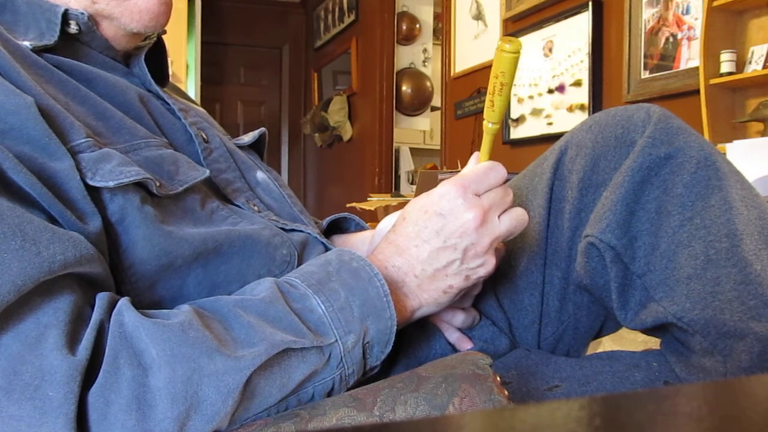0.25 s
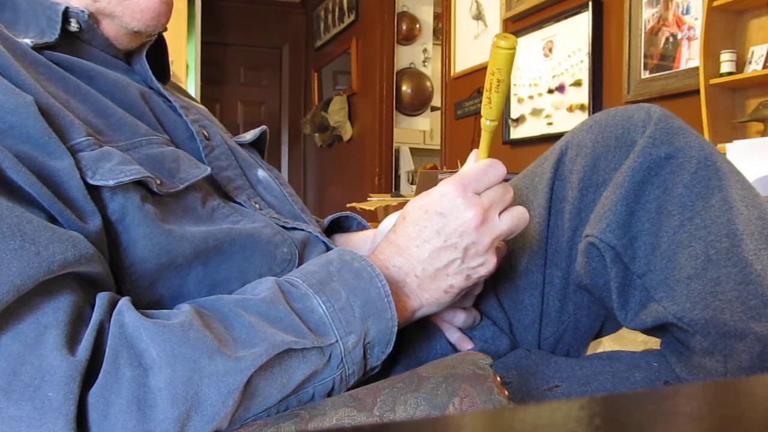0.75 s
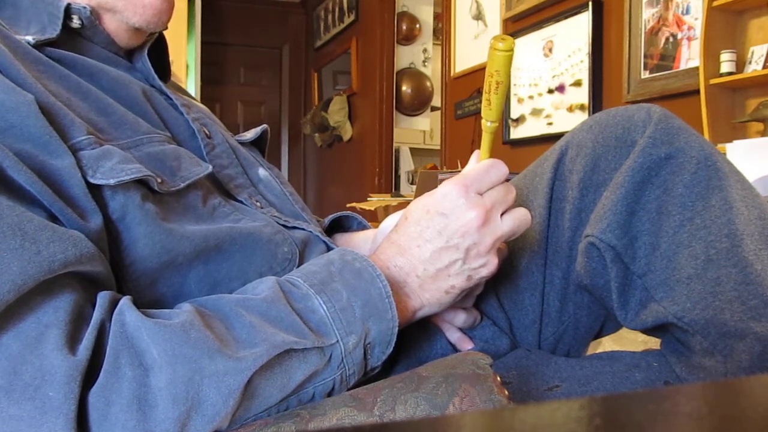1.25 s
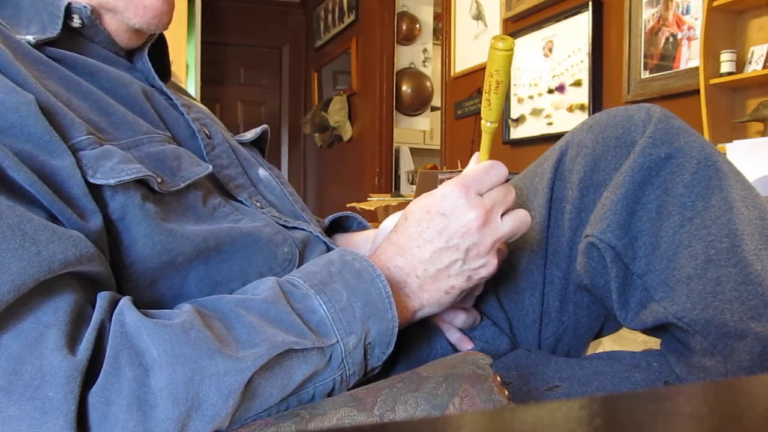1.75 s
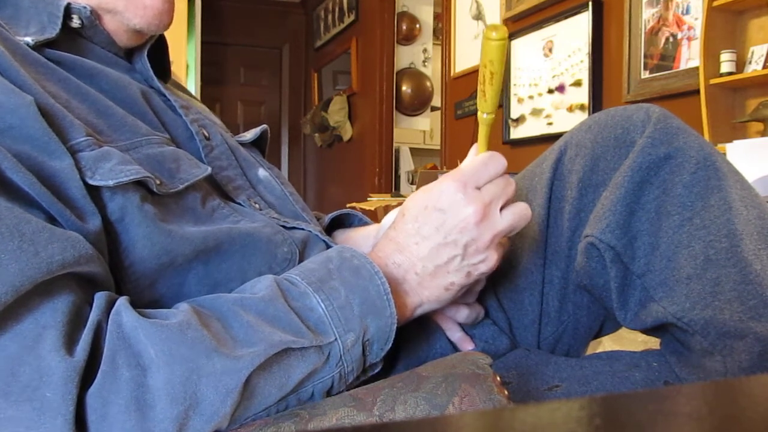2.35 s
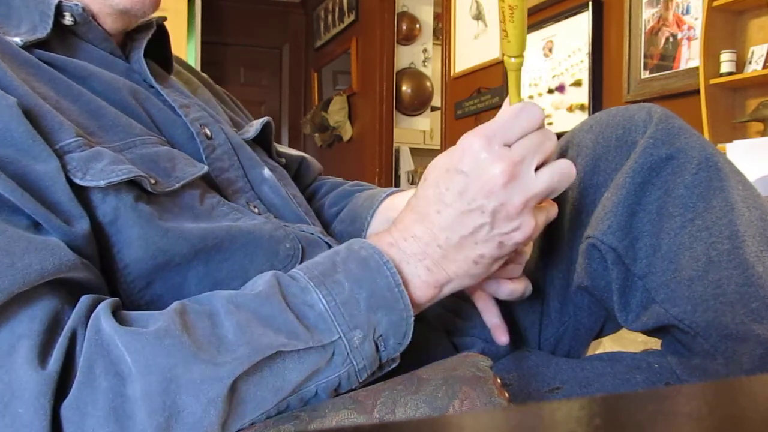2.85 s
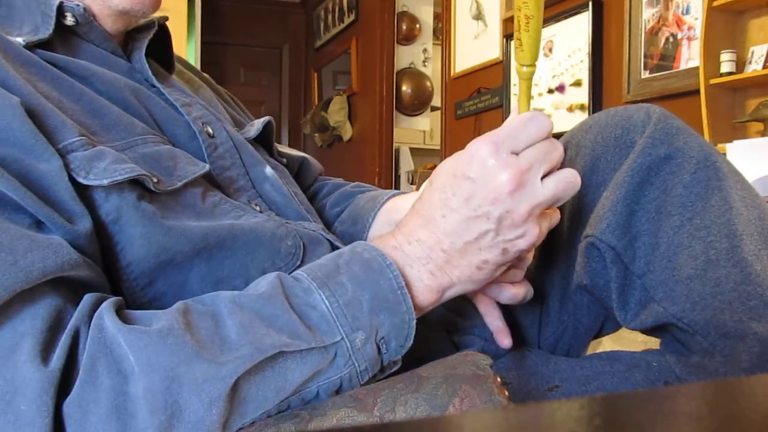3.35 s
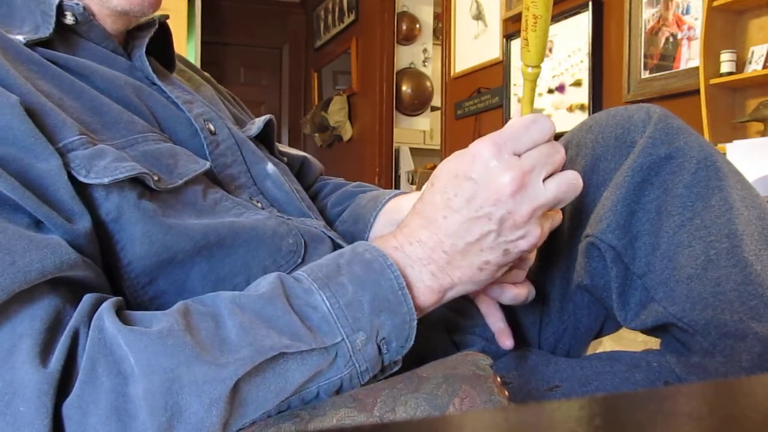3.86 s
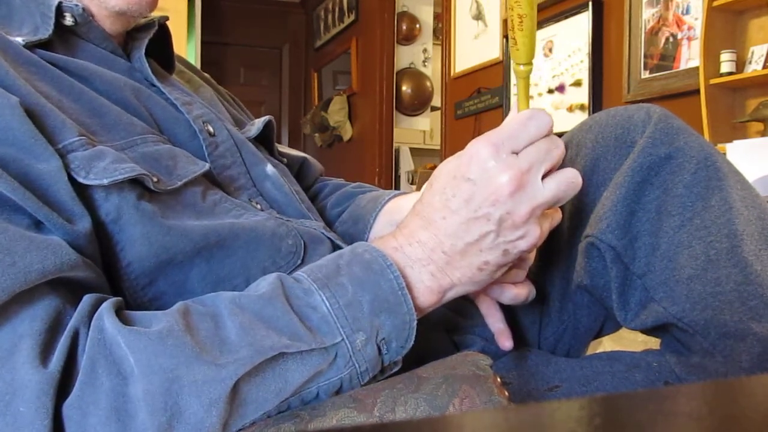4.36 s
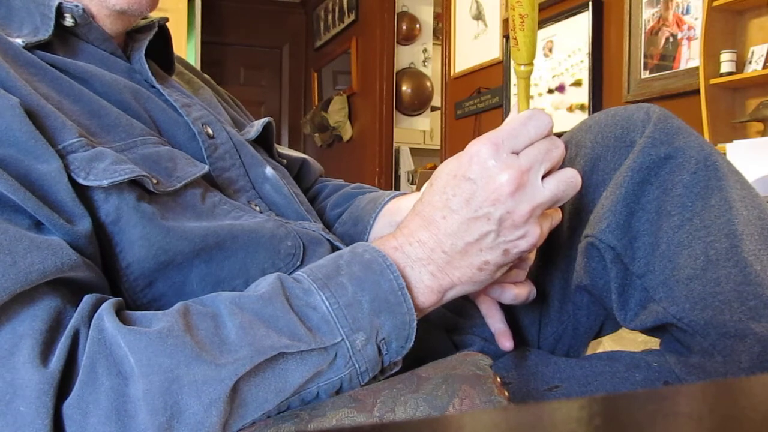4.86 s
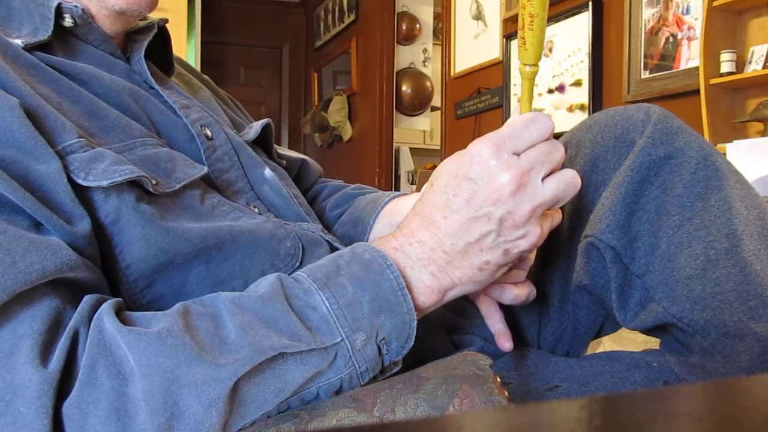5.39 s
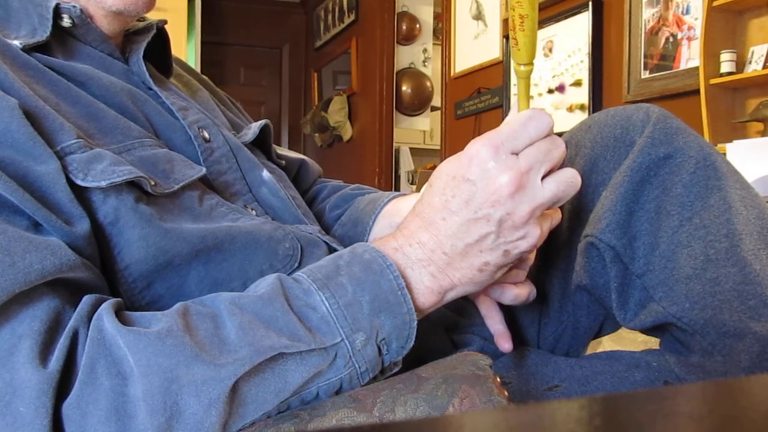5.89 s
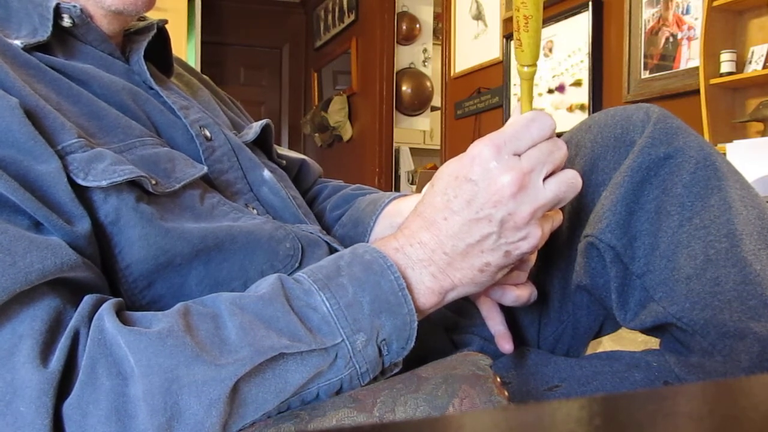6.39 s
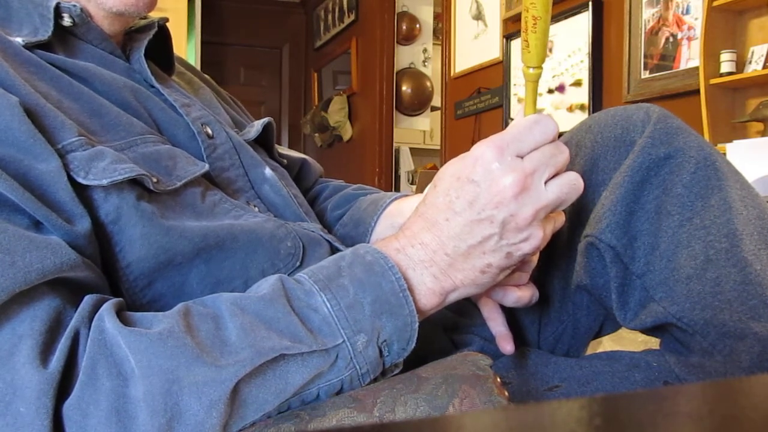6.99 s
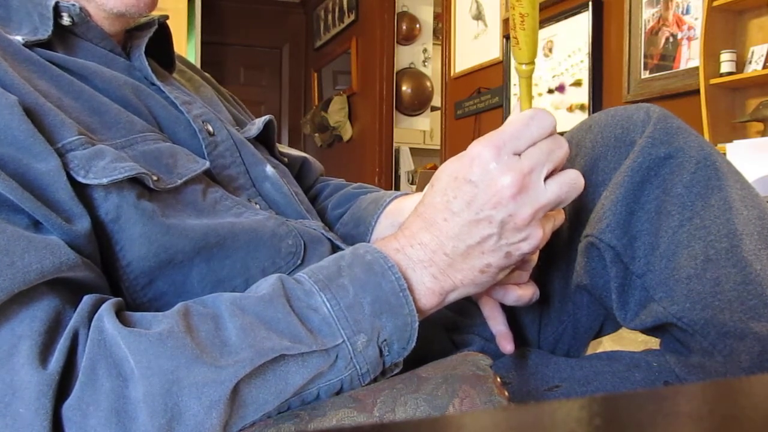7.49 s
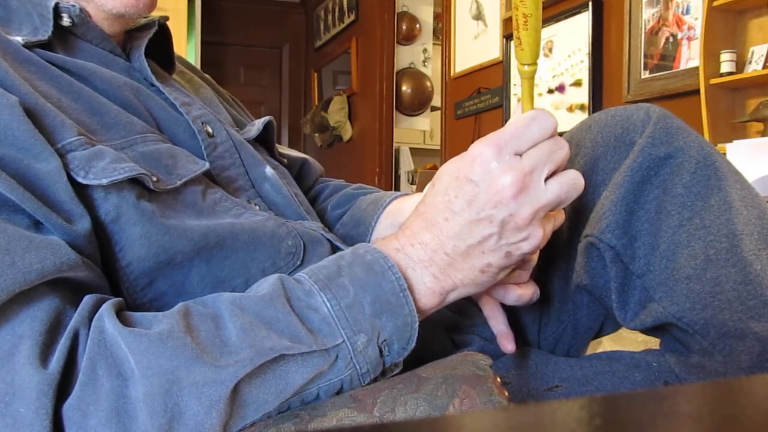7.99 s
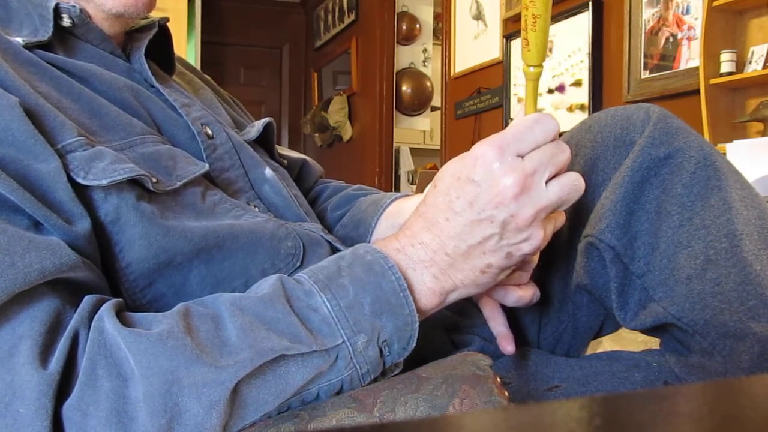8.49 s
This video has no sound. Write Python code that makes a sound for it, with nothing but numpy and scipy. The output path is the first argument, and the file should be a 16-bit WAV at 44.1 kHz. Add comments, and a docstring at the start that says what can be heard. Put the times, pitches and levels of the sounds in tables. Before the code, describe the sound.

Two sharp, woody turkey-like clucks from a friction pot call, then five short rattling purrs spaced by quiet pauses in a small, quiet room.

```python
"""A small quiet room, where a wooden striker is worked on a friction pot call: two sharp clucks, then five purrs.
Stick-slip friction repeats some 800 times a second and the pot brings out the second harmonic; in a purr
the tip skips from one short squeak to the next over a dry scrape. Soft taps are heard as the tip is set down.
Sleeves, made of shaped noise, rustle once; noise bands and steady tones form the faint rumble, hiss and hum."""
import sys
import numpy as np
from scipy import signal
from scipy.fft import rfft, irfft, next_fast_len
from scipy.io import wavfile
from scipy.ndimage import map_coordinates

SR = 44100
rng = np.random.default_rng(int(sys.argv[2]) if len(sys.argv) > 2 else 0)


def waveform_to_disk(signal):
    """Save audio, clipped to [-1, 1], as 16-bit WAV at the path in sys.argv[1]."""
    frames = np.transpose(np.atleast_2d(signal))
    scaled = np.clip(frames, -1, 1) * 32767
    samples = np.round(scaled).astype(np.int16)
    wavfile.write(sys.argv[1], SR, samples)


N = 385434
TIME = np.arange(N) / SR

# squeaks that stand out in the five purrs: middle_s, length_s, level_db, nominal pitch_hz in the grip
SQUEAKS = [(1.578, 0.02383, -43.5, 714.5), (1.626, 0.0168, -39, 760.6), (1.684, 0.021, -35.5, 801),
           (1.726, .017, -37.5, 819.5), (1.788, .022, -37, 813.7), (1.894, 0.0255, -24.5, 797.3),
           (1.938, 0.011, -21.5, 813), (1.982, .021, -24.5, 851), (2.017, 0.017, -14, 799.7),
           (2.06, 0.014, -17.5, 840), (3.321, 0.021, -26, 721.8), (3.333, 0.024, -24.5, 791.2),
           (3.357, 0.027, -16.5, 737.2), (3.434, 0.013, -20.5, 787.5), (3.467, 0.021, -14.5, 778),
           (3.554, 0.016, -16, 797.6), (3.595, .018, -11.5, 794.7), (3.683, .016, -12.5, 820.4),
           (3.721, 0.012, -11, 773), (3.77, .018, -18, 847), (3.816, 0.024, -14.5, 846),
           (5.008, .026, -36, 780), (5.03, 0.023, -20, 726), (5.053, 0.034, -23, 801.5),
           (5.078, 0.02, -19, 734.5), (5.137, 0.027, -16, 748.6), (5.169, 0.029, -15.5, 736.7),
           (5.251, 0.016, -17.5, 788.8), (5.27, 0.033, -15, 788.7), (5.296, .023, -20, 839.6),
           (5.356, 0.012, -17.5, 822.5), (5.394, .022, -11.5, 710.8), (5.413, 0.029, -20.5, 809),
           (5.465, .018, -12, 763), (5.498, 0.0398, -14, 786), (5.554, 0.013, -10, 772.3),
           (5.591, 0.013, -9.5, 718), (6.686, .017, -33.5, 771), (6.722, .014, -24, 787.5),
           (6.759, .021, -17.5, 765.3), (6.801, 0.014, -17, 699.8), (6.841, 0.018, -17, 762.6),
           (6.91, .022, -18.5, 790.5), (6.949, 0.046, -16.5, 793), (7.043, .025, -11.5, 712.7),
           (7.072, 0.027, -15, 780), (7.122, .018, -11, 737.7), (7.162, .02, -11.5, 774.3),
           (7.19, 0.022, -16, 799), (7.232, .014, -35, 783), (8.284, 0.029, -31, 666.5),
           (8.321, 0.016, -30.5, 748), (8.386, .027, -22.5, 708), (8.413, 0.052, -25, 762),
           (8.485, .026, -24.5, 789), (8.518, 0.028, -18.5, 751), (8.544, 0.026, -27, 810),
           (8.59, 0.014, -23.5, 813), (8.626, 0.024, -14, 700), (8.715, 0.033, -16.5, 764.5)]
# one row per purr: chatter_start_s, chatter_end_s, then fundamental_db and scrape_db at the start
PURRS = [(1.6, 1.8, -29.5, -37), (3.34, 3.8, -37.5, -38.5), (5.01, 5.6, -39.5, -43),
         (6.7, 7.24, -39, -41.5), (8.358, 8.72, -39, -43)]
# hiss of the slipping contact, relative spectrum: freq_hz, density_db (per Hz)
GRIT = [(500, -52), (900, -14), (2300, 1.5), (3000, -9.5), (4500, -8.5), (6500, -12.5), (9000, -16.5),
        (12000, -17.5), (15500, -45)]


def amp(db):
    """The decibel law: level to amplitude ratio."""
    return 10 ** (np.asarray(db) / 20)


def unit(x):
    """Normalisation by effective value: x at rms 1."""
    return x / np.sqrt(np.mean(x ** 2) + 1e-20)


def along(points, hz):
    """Interpolation of (freq_hz, value) points on a logarithmic frequency axis."""
    f, v = np.transpose(points)
    return np.interp(np.log(hz + 1), np.log(f + 1), v)


def gains(rows):
    """Envelopes linear in decibels, one for each column after the time; silent before and after."""
    s, *columns = np.transpose(rows)
    sounding = (TIME > s[0] - .05) * (TIME < s[-1] + .05)
    return [amp(np.interp(TIME, s, column)) * sounding for column in columns]


def wobble(rate):
    """Random modulation, slow or rough: a smooth curve through random knots, rate of them a second."""
    knots = rng.standard_normal(int(N * rate / SR) + 4)
    return map_coordinates(knots, [TIME * rate], order=2)


def filtered(x, response):
    """Linear filtering: the spectrum of x times a complex response of frequency."""
    m = next_fast_len(N + 8192)
    return irfft(rfft(x, m) * response(np.fft.rfftfreq(m, 1 / SR)), m)[..., :N]


def noise(spectrum):
    """Coloured noise: white noise shaped by a spectrum, at rms 1."""
    return unit(filtered(rng.standard_normal(N), lambda hz: amp(along(spectrum, hz))))


def diffuse(spectrum, side_db):
    """A diffuse field: independent middle and side noises make stereo of rms 1."""
    mid, side = noise(spectrum), amp(side_db) * noise(spectrum)
    return unit(np.array([mid + side, mid - side]))


def background(right_db=.45):
    """Steady room noise as two diffuse bands and weak tones, growing over the first seconds."""
    # overall course: time_s, rumble_db, hiss_db
    course = [(0, -58.5, -58.5), (.8, -59, -61.5), (1.5, -56, -58.5), (2.2, -52.5, -55), (3, -50.5, -52.5),
              (8.7, -50, -52.5)]
    # relative noise spectra: freq_hz, density_db (per Hz)
    rumble_spectrum = [(15, -52), (25, -30.5), (48, -8.5), (85, -10.5), (108, -7.5), (145, -5.5), (229, 0),
                       (308, -9), (364, -8.5), (395, -7), (487, -7.5), (545, -11), (700, -18), (910, -41.5),
                       (1540, -120)]
    hiss_spectrum = [(350, -34.5), (700, -1.5), (1300, -4.5), (2150, -4), (4000, -9), (5800, -11.5),
                     (7500, -20.5), (9300, -21.5), (10100, -13), (10600, -19), (11100, -13.5), (11500, -21),
                     (11900, -14), (12400, -22), (13000, -19), (15500, -42)]
    # hum tones: freq_hz, level_db (rms, where the rumble is strongest, before the channel gains)
    hum_tones = [(59, -66.5), (120, -63.5), (240, -61), (931, -70), (1055, -67), (10104, -82)]
    rumble, hiss = gains(course)
    hum = np.zeros(N)
    for hz, db in hum_tones:
        hum += amp(db) * np.sqrt(2) * np.sin(2 * np.pi * hz * TIME + .5 * wobble(3.9))
    air = rumble * diffuse(rumble_spectrum, side_db=-8.0) + hiss * diffuse(hiss_spectrum, side_db=-1.5)
    return (air + hum * rumble / rumble.max()) * amp([[-right_db], [right_db]])


def pot(force):
    """Modal resonance: the response of plate and striker to a force on the plate."""
    # modes of plate and striker: freq_hz, width_hz, level_db
    modes = [(851, 100, -2), (1008, 144, 0.5), (1296, 36.5, 2), (1637, 110, -6.5), (2600, 110, -18),
             (4500, 180, -36.5)]

    def response(f):
        total = 0
        for k, (centre, width, db) in enumerate(modes):
            damping = 1j * f * width
            total = total + (-1) ** k * amp(db) * damping / (centre * centre - f * f + damping)
        return total / (1 + 1j * f / 3500)  # a gentle loss of treble

    return filtered(force, response)


def scrape(grains_per_s=2500):
    """Friction as random impulses: the tip stutters over the grain and excites the modes; rms 1."""
    catches = (rng.random(N) < grains_per_s / SR) * (1 + .5 * rng.standard_normal(N))
    return unit(pot(catches))


def overtones(pitch, phase, colour, order=2, bright=1):
    """Harmonics of the stick-slip cycle from the given order up, each as strong as the pot radiates it."""
    total = 0
    for k in np.arange(order, 19):
        level = amp(along(colour, k * pitch)) * (bright if k > 2 else 1)
        total = total + level * np.sin(k * phase + k * k)
    return total


def clucks(striker_hz=965, striker_db=-5, fade_s=0.0098, held=0.41, sag=0.095, jitter=.011,
           grit_db=-23, rasp_db=-20):
    """Onset of stick-slip: the striker shudders ever harder, the tip bites, the pot barks and its pitch sags."""
    # clucks: bite_s, length_s, level_db, nominal pitch_hz, build_s, striker hum_db after the bite
    cluck_rows = [(0.0219, .046, -3.5, 695.2, .0013, -31), (0.4182, .031, -4, 728, 0.0021, -18.5)]
    # strength of the harmonics that the pot radiates: freq_hz, level_db
    colour = [(700, -25), (1400, -1), (2150, -11.5), (2760, -31), (2930, -23), (3600, -33.5), (4150, -30.5),
              (4420, -18.5), (4800, -40), (7000, -38), (12000, -63)]
    out, waver = np.zeros(N), wobble(700)
    rough = amp(grit_db) * noise(GRIT) + amp(rasp_db) * scrape()
    for s, length, db, hz, build, hum_db in cluck_rows:
        near = slice(max(0, int((s - length) * SR)), int((s + 2 * length) * SR))
        t = TIME[near] - s
        bite = (1 + np.tanh(t / 0.001)) / 2
        force = held + (1 - held) * np.exp(-np.abs(t) / fade_s)
        release = (1 - np.tanh((t - length) / (0.15 * length))) / 2
        level = amp(db) * bite * force * release
        stroke = np.clip(t / length, 0, 1.1)
        bend = 0.017 * np.sin(np.pi * stroke ** 2) - sag * stroke ** 4
        pitch = hz * (1 + bend + jitter * waver[near])
        phase = 2 * np.pi * np.cumsum(pitch) / SR
        shudder = np.sin(2 * np.pi * striker_hz * t)
        swell = 1 / (1 + np.exp(-(t / build + 2.24)))
        lead_in = amp(striker_db) * (1 - bite) * swell * (shudder + 0.35 * swell * shudder ** 2)
        # the striker's mode beats with the slips: a rattle
        beat = amp(hum_db) * np.sin(2 * np.pi * striker_hz * t - phase)
        bark = (1 + 2 * beat) * overtones(pitch, phase, colour, order=1)
        out[near] += lead_in + level * (bark + amp(hum_db) * shudder + force * rough[near])
    return out


def taps(decay_s=0.0021, rise_s=0.00047, tap_db=3):
    """Damped free vibration: soft knocks as the tip is set down on the plate."""
    # taps: start_s, level_db (before tap_db), pitch_hz
    tap_rows = [(0.329, -29, 1117), (1.453, -33, 1100), (3.189, -28, 1270), (4.948, -34.5, 1403)]
    out, t = np.zeros(N), np.arange(SR // 20) / SR
    envelope = np.exp(-t / decay_s) * (1 - np.exp(-t / rise_s))
    for s, db, hz in tap_rows:
        knock = amp(db + tap_db) * np.sin(2 * np.pi * hz * t) * envelope
        out[round(s * SR):][:len(t)] += knock
    return out


def chatter(rate_per_s=24, length_s=.014, level_db=-42.5, pitch_hz=769,
            scatter_db=1.5, scatter_hz=22, scatter_s=.004, clear_s=.012):
    """Irregular stick-slip: faint catches in the gaps between the squeaks, as rows of the same kind."""
    times = np.concatenate([np.arange(start, end, 1 / rate_per_s) for start, end, *_ in PURRS])
    chance = rng.standard_normal((300, 3))
    middles, lengths = np.transpose(SQUEAKS)[:2]
    rows = []
    for s, (a, b, c) in zip(times, chance):
        if np.all(np.abs(s - middles) > lengths / 2 + clear_s):
            rows.append((s + scatter_s * a, length_s, level_db + scatter_db * b, pitch_hz + scatter_hz * c))
    return rows


def squeaks(usual_db=-20, usual_hz=780, usual_s=.02, chatter_scrape_db=-3):
    """Friction grows with load: fundamental and scrape (dB) rise with the grip and along the stroke."""
    swell_db_per_s, scrape_db_per_s = 11, 12  # the hand bears down as the stroke goes on
    low_follows, scrape_follows = 0.46, 0.22  # dB gained for each dB of a squeak above the usual one
    low_db_per_hz = 0.0609  # a higher pitch brings the fundamental nearer the lowest resonance of the pot
    skid_db = -4  # change of the scrape for each doubling of a squeak's length
    # a faint catch scrapes less
    for rows, rub_offset_db in (SQUEAKS, 0), (chatter(), chatter_scrape_db):
        for s, length, db, hz in rows:
            start, _, low_db, rub_db = min(PURRS, key=lambda purr: abs(purr[0] - s))
            firmer_db = db - usual_db
            low_db += swell_db_per_s * (s - start) + low_follows * firmer_db
            low_db += low_db_per_hz * (hz - usual_hz)
            rub_db += scrape_db_per_s * (s - start) + scrape_follows * firmer_db
            rub_db += skid_db * np.log2(length / usual_s)
            yield s, length, db, hz, low_db, rub_db + rub_offset_db


def purrs(free_hz=885, rise=.8, jitter=0.022, flutter_db=1, fundamental_db=0, third_db=-3,
          grit_db=-31, scrape_db=1):
    """Stick-slip under varying grip: a squeak swells as its pitch dips, then rises as the tip breaks free."""
    # strength of the overtones that the pot radiates: freq_hz, level_db
    colour = [(1400, 1), (1700, -2), (2150, -7), (2550, -13.5), (2750, -22.5), (2900, -27.5), (3250, -22.5),
              (3750, -31.5), (4300, -24.5), (5200, -41.5), (8300, -39.5), (9500, -58), (15000, -73.5)]
    power, weight = np.zeros((3, N)), np.full(N, 1e-9)
    pitch = 800 * weight  # a weighted sum, resting at 800 Hz
    for s, length, db, hz, low_db, rub_db in squeaks():
        near = slice(int((s - 2 * length) * SR), int((s + 2 * length) * SR))
        u = (TIME[near] - s) / (length / 2)
        u = u * np.where(u < 0, 1.3, .8)  # the tip catches faster than it lets go

        def bump(width, delay):
            return np.exp(-np.abs((u - delay) / width) ** 3)

        # fundamental and scrape outlast the firm grip
        grip, low, rub = amp(db) * bump(1, 0), amp(low_db) * bump(1.56, 0.21), amp(rub_db) * bump(2.16, 0.23)
        power[:, near] += np.array([grip, low, rub]) ** 2
        hold = amp(db) * np.exp(-2 * u * u)  # where squeaks run together, the firmer one sets the pitch
        escape = np.tanh(np.where(u < 0, .3, 1.05) * u * u)
        weight[near] += hold
        pitch[near] += hold * (hz - 4 + rise * (free_hz - hz) * escape)
    level, low, rub = np.sqrt(power)
    loose = 1 / np.sqrt(1 + level / amp(-16.0))  # a light grip is less regular
    pitch = pitch / weight * (1 + jitter * loose * wobble(350))
    phase = 2 * np.pi * np.cumsum(pitch) / SR
    level = level * amp(flutter_db * loose * wobble(330))
    third = amp(third_db + along(colour, 3 * pitch)) * np.sin(3 * phase + 9)
    tone = amp(fundamental_db) * low * (np.sin(phase) + third)
    on = level > 1e-5
    bright = level[on] / (level[on] + amp(-25))  # a firm grip slips more abruptly
    tone[on] += level[on] * overtones(pitch[on], phase[on], colour, bright=bright)
    grit = amp(grit_db) * level * noise(GRIT) * (1 + np.cos(phase))  # a puff at every slip
    return tone + grit + amp(scrape_db) * rub * scrape()


def sleeves(right_db=.45):
    """Broadband friction noise under one swell: sleeves brush as the hands shift."""
    # the swell: time_s, level_db
    brush = [(2.25, -88), (2.45, -60), (2.62, -50.5), (2.8, -59.5), (3.1, -79)]
    # relative spectrum of cloth: freq_hz, density_db (per Hz)
    cloth = [(100, -19), (220, 4.5), (450, 6), (900, -3.5), (3000, -10), (7000, -15), (15000, -34)]
    return gains(brush)[0] * diffuse(cloth, side_db=-16) * amp([[-right_db], [right_db]])


def radiate(x, low_hz=720):
    """Modal decay and radiation: the plate sings on after each squeak; so small a body gives off no bass."""
    # long-ringing modes of the plate: freq_hz, t60_s, level_db (gain at resonance)
    modes = [(879, 0.37, -8), (967, 0.3, -9), (1610, 0.46, -19.5), (2100, .4, -19), (2420, 0.31, -17.5),
             (2600, 0.67, -1), (2920, 0.34, -5.5), (4450, .18, -12.5)]
    t = TIME[:SR // 3]
    ring = np.zeros(len(t))
    for hz, t60, db in modes:
        peak_scale = 2 * np.log(1000) / (t60 * SR)  # unit gain at resonance
        ring += amp(db - 60 * t / t60) * np.cos(2 * np.pi * hz * t) * peak_scale
    high_pass = signal.butter(8, low_hz, "high", fs=SR, output="sos")
    return signal.sosfilt(high_pass, x + signal.fftconvolve(x, ring)[:N])


def mirrored(x):
    """Specular reflection: nearby surfaces return the call to the two ports at different moments."""
    # reflections: left_delay_s, right_delay_s, level_db
    mirrors = [(.0021, .0026, -30.5), (.0064, .0057, -23)]

    def response(hz):
        return sum(amp(db) * np.exp(-2j * np.pi * hz * np.array([[left], [right]]))
                   for left, right, db in mirrors)

    return filtered(x, response)


def room(x, side_db=-4, gap_s=.005):
    """Reverberation: the walls answer after a short gap, each frequency dying at its own speed."""
    # reverberation time: freq_hz, t60_s
    decay = [(300, 0.52), (1000, 0.34), (1650, .27), (2400, 0.42), (4500, .33), (10000, 0.14)]
    hz, t, z = signal.stft(rng.standard_normal((2, SR // 2)), SR, nperseg=256)
    z = z * amp(-60 * t / along(decay, hz)[:, None])
    mid, side = signal.istft(z, SR, nperseg=256)[1]
    tail = np.array([mid + amp(side_db) * side, mid - amp(side_db) * side])
    tail = tail / np.linalg.norm(tail[0])
    late = np.pad(x, (int(gap_s * SR), 0))
    return signal.fftconvolve(late[None], tail, axes=1)[:, :N]


def scene(room_db=-11.5, right_db=1.18, lag_s=4.5e-5):
    """Level and time differences between ports: the close call is a little louder and sooner at the right."""
    call = radiate(clucks() + purrs() + taps())
    half_lag = np.array([[-1], [1]]) * lag_s / 2
    direct = filtered(call, lambda hz: np.exp(2j * np.pi * hz * half_lag))
    heard = direct + mirrored(call) + amp(room_db) * room(call)
    return heard * amp([[-right_db], [right_db]]) + background() + sleeves()


def record(dry):
    """Band limitation: nothing passes from 15.7 kHz up."""
    return filtered(dry, lambda hz: hz < 15700)


dry = scene()
out = record(dry)
waveform_to_disk(out)
```